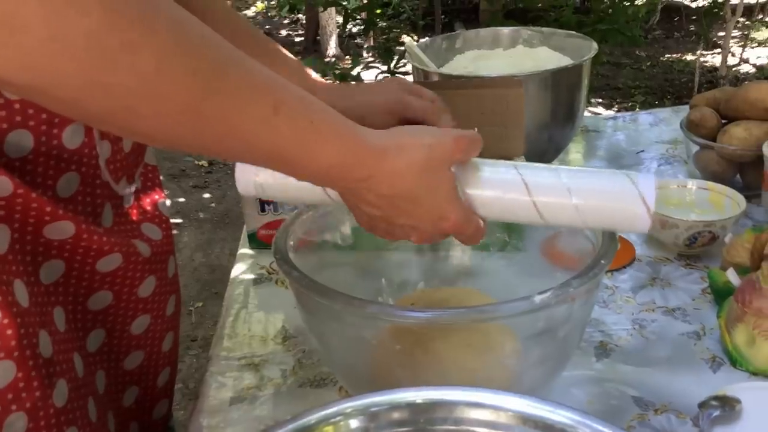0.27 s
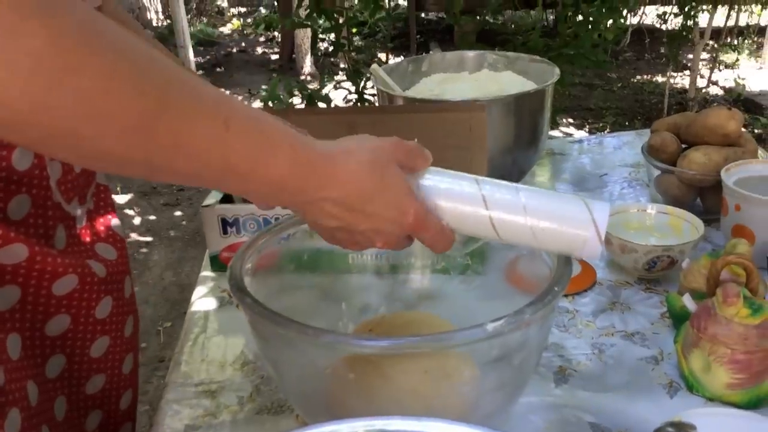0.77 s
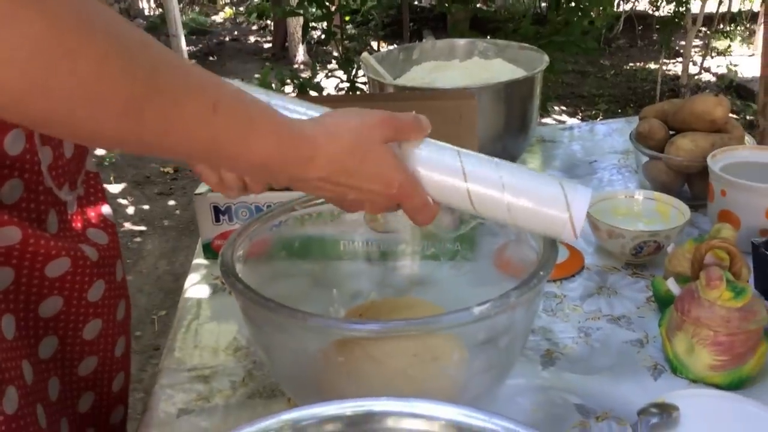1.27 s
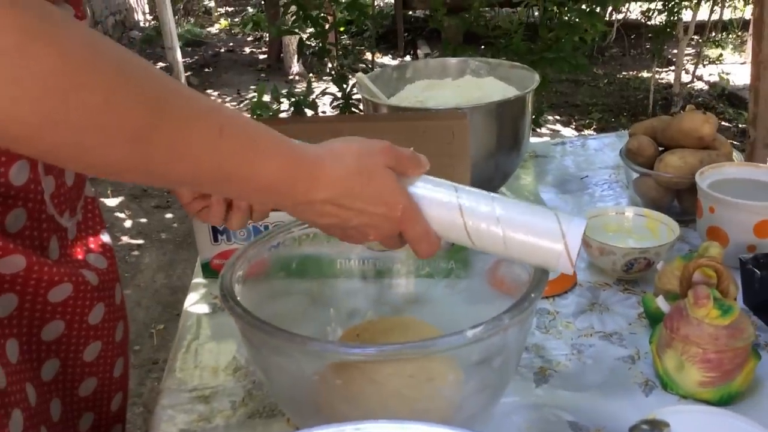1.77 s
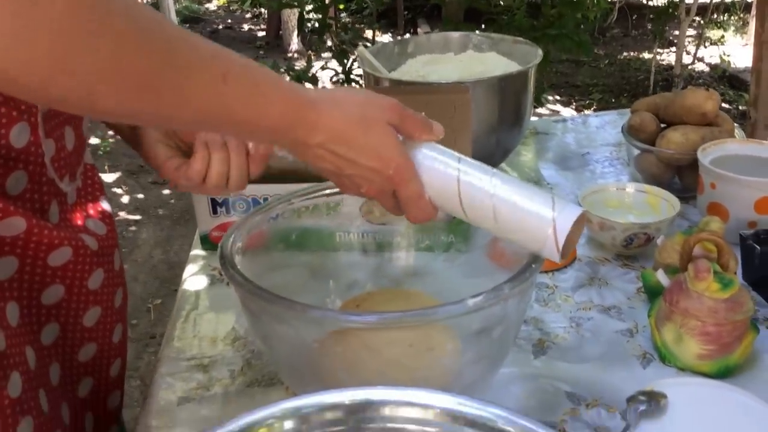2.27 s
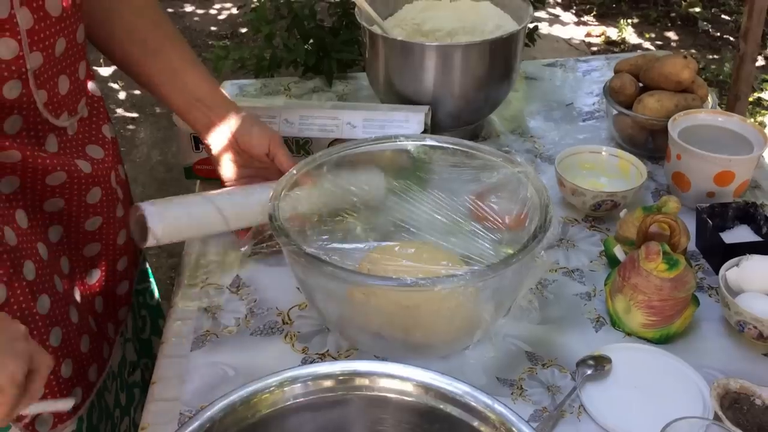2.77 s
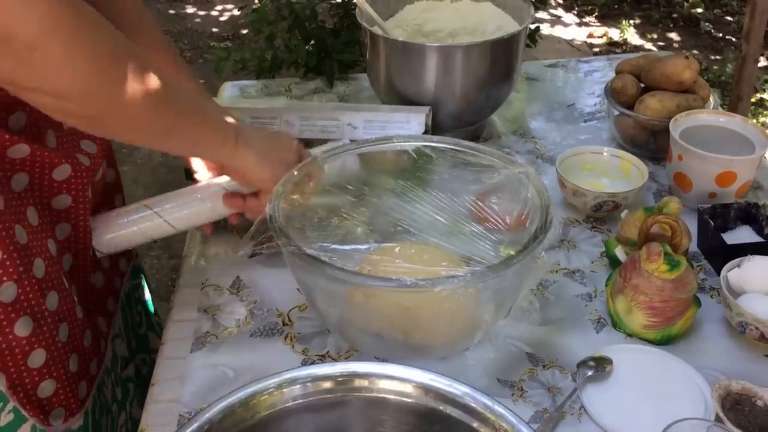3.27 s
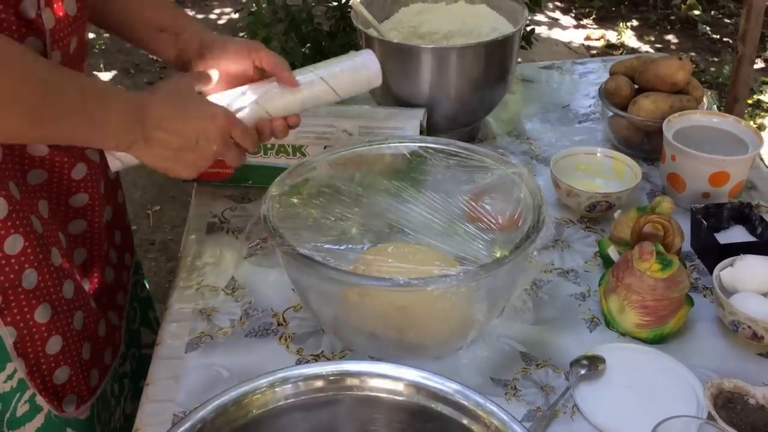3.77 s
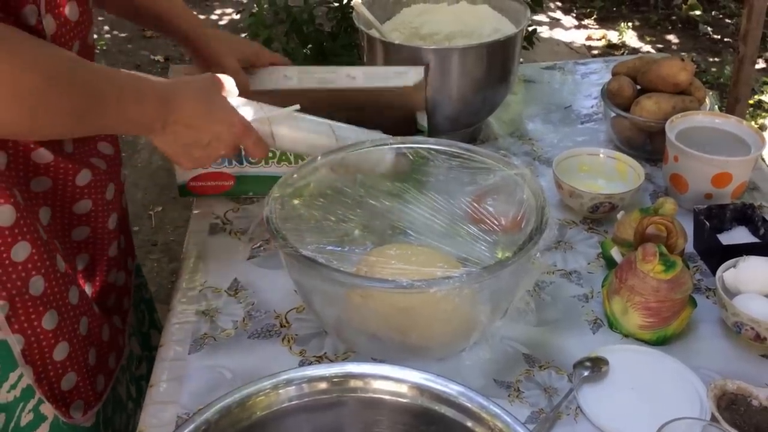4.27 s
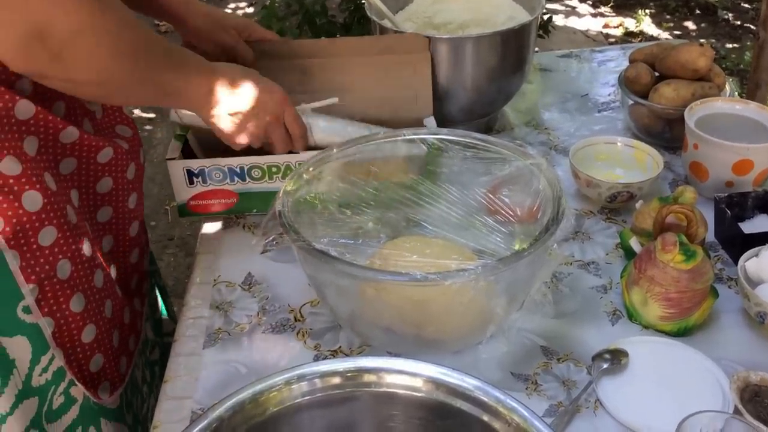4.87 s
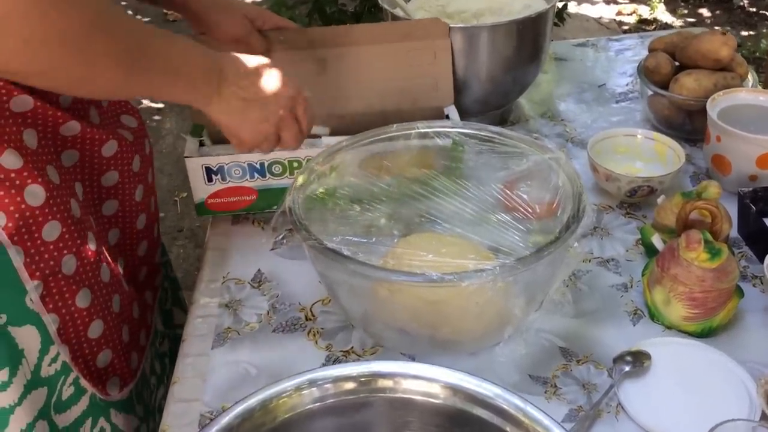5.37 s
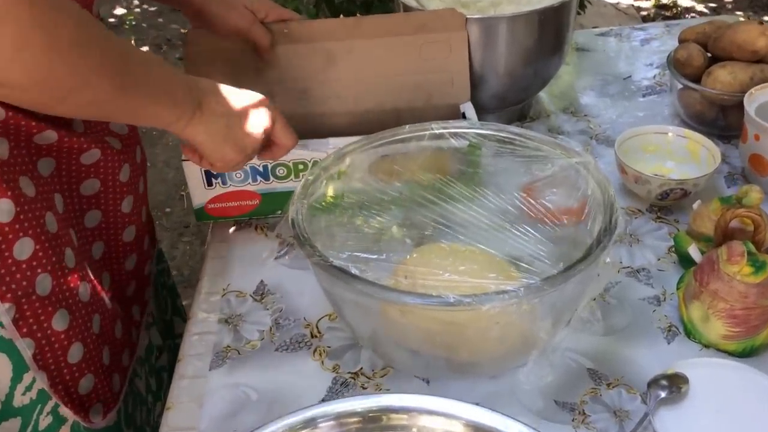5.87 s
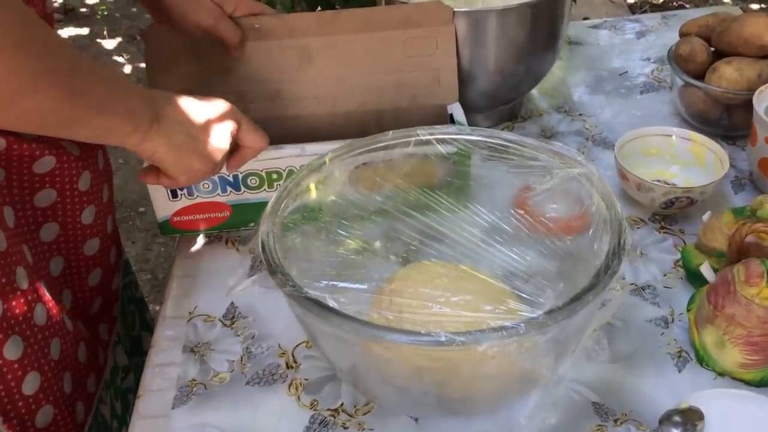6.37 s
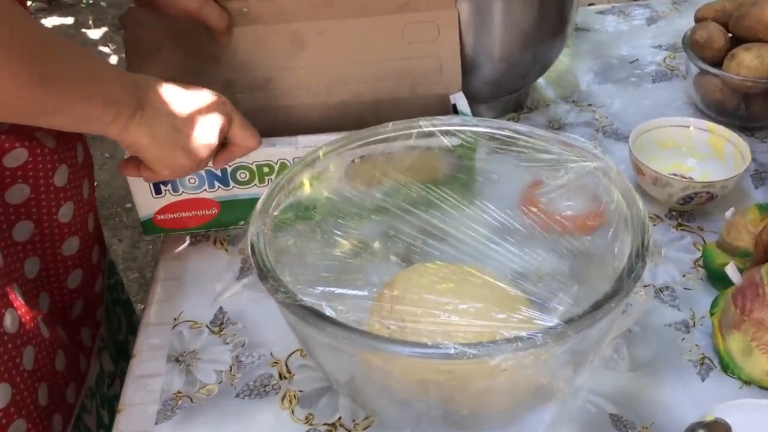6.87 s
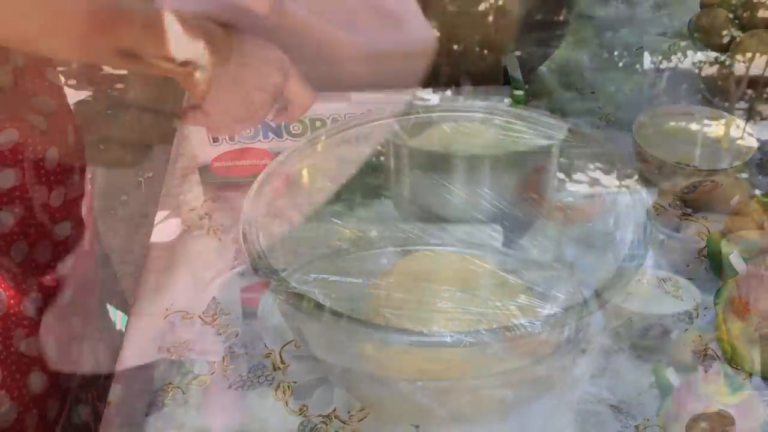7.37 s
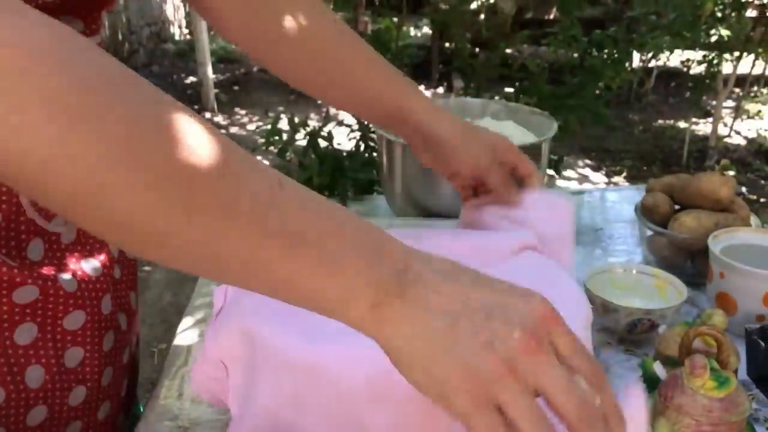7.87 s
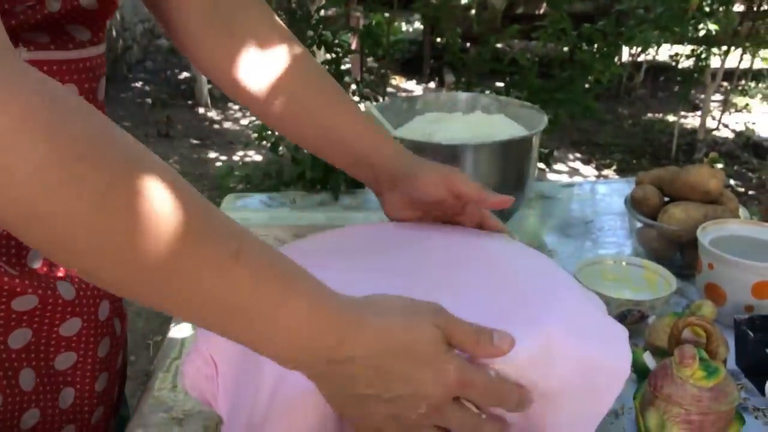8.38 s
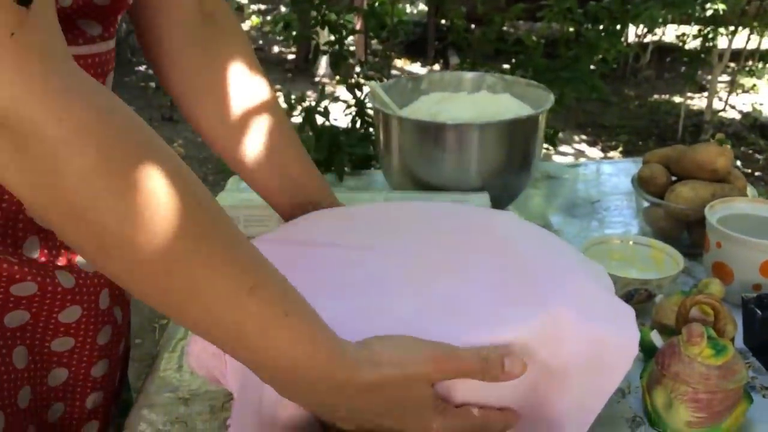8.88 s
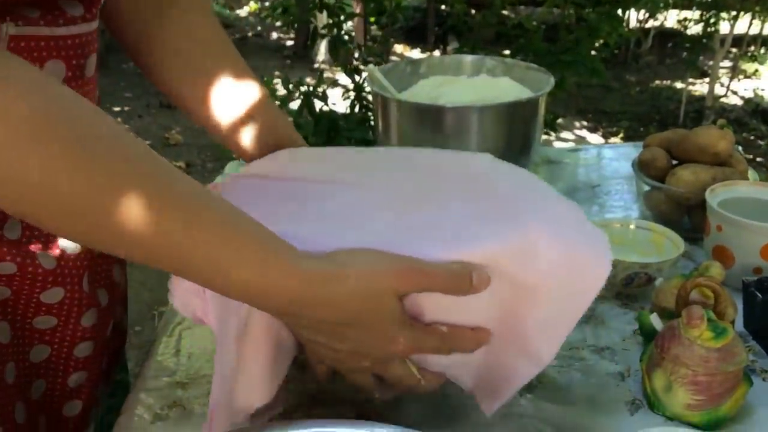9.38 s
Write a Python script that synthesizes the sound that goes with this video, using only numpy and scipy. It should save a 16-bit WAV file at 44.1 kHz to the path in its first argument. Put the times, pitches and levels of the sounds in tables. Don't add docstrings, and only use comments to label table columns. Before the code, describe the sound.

Near microphone outdoors, little echo. Faint gliding bird whistles open over low airy rumble. Thin plastic film rustles, then snaps sharply in dense bursts as it is pulled and torn over a glass bowl. Hollow cardboard taps lead to heavy carton thumps around five seconds, then creasing card and nudges. After a quick rustling swell and tiny dropout, a cloth brushes the bowl softly, ending with light film ticks.

```python
import sys
import numpy as np
from scipy import signal
from scipy.fft import rfft, irfft
from scipy.io import wavfile
from scipy.ndimage import uniform_filter1d, minimum_filter1d

SR = 44100
rng = np.random.default_rng(int(sys.argv[2]) if len(sys.argv) > 2 else 0)


def master(y):
    cut = np.clip(np.atleast_2d(y).T, -1, 1)
    pcm = np.round(cut * 32767)
    wavfile.write(sys.argv[1], SR, pcm.astype(np.int16))


def attenuation_scalar(level_db):
    decades = np.asarray(level_db, float) / 20
    return 10 ** decades


N = 424241


def time(length):
    return np.arange(int(length * SR)) / SR


def evened(x):
    return x / np.sqrt(np.mean(x ** 2) + 1e-20)


def peaked(x):
    return x / abs(x).max()


def read(points, hz):
    f, value = np.transpose(points)
    return np.interp(np.log(hz + 1), np.log(f + 1), value)


def add(mix, s, sound):
    part = mix[round(s * SR):][:len(sound)]
    part += sound[:len(part)]


def band(x, low_hz, high_hz):
    return signal.sosfilt(signal.butter(3, [low_hz, high_hz], "band", fs=SR, output="sos"), x)


def coloured(x, points):
    gain_db = read(points, abs(np.fft.fftfreq(2048, 1 / SR)))
    log_gain = np.log(attenuation_scalar(np.maximum(gain_db, -90)))
    taps = np.fft.ifft(np.exp(np.conj(signal.hilbert(log_gain)))).real[:1024]
    return signal.oaconvolve(x, taps / np.linalg.norm(taps))[:len(x)]


def resonate(x, hz, width):
    return signal.lfilter(*signal.iirpeak(hz, hz / width, SR), x)


def ring(hz, t60, rise):
    t = time(1.2 * t60 + rise)
    onset = np.sin(np.pi / 2 * np.minimum(t / rise, 1)) ** 2
    return np.sin(2 * np.pi * hz * t) * attenuation_scalar(-60 * t / t60) * onset


def grains(per_s, spread_db):
    size = attenuation_scalar(spread_db * np.minimum(rng.exponential(1, N), 5)) * rng.choice([-1., 1.], N)
    return evened(size * (rng.random(N) < per_s / SR))


def swell(middle, length):
    return np.exp(-(3.06 * (np.arange(N) / SR - middle) / length) ** 2)


def drifting(shape, frames, bins):
    patches = rng.standard_normal(shape)
    return evened(uniform_filter1d(uniform_filter1d(patches, size=bins, axis=0), size=frames, axis=1))


def mottled(x, patchy_db):
    z = signal.stft(x, nperseg=512, noverlap=384)[2]
    patches = drifting(z.shape, frames=14, bins=10)
    return evened(signal.istft(z * attenuation_scalar(patchy_db * patches), nperseg=512, noverlap=384)[1][:len(x)])


# frequency in Hz, level in dB per Hz
AIR = [(15, -59.5), (25, 1.5), (97, 3), (256, -6.5), (451, -23), (489, -30), (714, -18), (840, -16),
       (1070, -17.5), (1260, -12), (3710, -22), (14700, -28.5), (16000, -58)]


def air():
    frames, hz = N // 256 + 5, np.fft.rfftfreq(1024, 1 / SR)
    a, b = rng.standard_normal((2, 513, frames))
    flicker = evened(uniform_filter1d(rng.standard_normal(frames), size=6))
    patches = drifting((513, frames), frames=12, bins=20)
    steadier_lows = np.clip(hz / 300, .45, 1)[:, None]
    level_db = read(AIR, hz)[:, None] + (2.6 * patches + 1.4 * flicker) * steadier_lows
    z = (a + 1j * b) * attenuation_scalar(level_db)
    return attenuation_scalar(-57) * evened(signal.istft(z, nperseg=1024, noverlap=768)[1][:N])


# start in seconds, length in seconds, first pitch in Hz, last pitch in Hz, level in dB
BIRD = [(.155, .055, 3350, 2400, -63), (.3, .09, 3200, 3080, -67), (.375, .06, 4350, 4100, -66),
        (.58, .09, 3300, 2700, -61), (.685, .06, 3800, 3500, -61), (.9, .085, 3650, 2450, -61),
        (1.05, .08, 4100, 3400, -65), (1.13, .05, 3700, 3100, -64), (6.39, .065, 2100, 2550, -70),
        (6.445, .09, 2550, 2300, -70), (6.585, .13, 4100, 2600, -67), (6.96, .09, 4100, 2800, -66)]


def bird():
    out = np.zeros(N)
    husk = 1 + 1.1 * evened(uniform_filter1d(rng.standard_normal(N), size=200))
    for s, length, first_hz, last_hz, db in BIRD:
        u = time(length) / length
        pitch = first_hz + (last_hz - first_hz) * u ** 1.4
        whistle = np.sin(2 * np.pi * np.cumsum(pitch) / SR)
        add(out, s, attenuation_scalar(db + 9) * whistle * (.4 + .8 * u) * signal.windows.tukey(len(u), .5))
    echoes = rng.standard_normal(6000) * attenuation_scalar(-60 * np.arange(6000) / SR / 0.23)
    return .6 * husk * out + 1.1 * signal.oaconvolve(out, echoes / np.linalg.norm(echoes))[:N]


# start in seconds, level in dB
TOUCHES = [
    (1.394, -40),
    (3.37, -60),
]
# pitch in Hz, level in dB, time to fall 60 dB in seconds
BOWL = [(1034, 0, .67), (1933, -9, .25), (2794, -16, .2)]


def bowl():
    out = np.zeros(N)
    for s, blow_db in TOUCHES:
        for hz, db, t60 in BOWL:
            add(out, s, attenuation_scalar(blow_db + db) * ring(hz, t60, rise=0.00079))
    return out


def rubbed(notes):
    out = np.zeros(N)
    for s, length, hz, db in notes:
        rub = rng.standard_normal(SR // 2)
        note = resonate(resonate(rub, hz, .04 * hz), hz, .04 * hz)
        note = evened(note)[-len(time(length)):]
        add(out, s, attenuation_scalar(db + 7.5) * note * signal.windows.tukey(len(note), .5))
    return out


# start in seconds, length in seconds, pitch in Hz, level in dB
RIM = [(7.85, .45, 2760, -73), (7.865, .1, 2760, -68), (7.715, .12, 1100, -71), (8.07, .05, 1320, -67),
       (7.83, .5, 1330, -75), (8.21, .08, 1320, -69), (7.94, .1, 1640, -72), (3.71, .05, 2650, -64),
       (4.827, .024, 4780, -53), (4.51, .06, 2420, -65), (7.86, .2, 3250, -70), (7.94, .2, 3620, -75),
       (8.2, .07, 3150, -69), (8.07, .07, 5700, -70)]


def rim():
    return rubbed(RIM)


# start in seconds, length in seconds, pitch in Hz, level in dB
SQUEAKS = [(2.93, .045, 2500, -66), (3.015, .03, 3280, -67), (3.255, .03, 3100, -67),
           (3.42, .045, 1550, -69), (3.505, .05, 1600, -68), (3.37, .09, 1940, -64),
           (4.311, .02, 3500, -44), (2.95, .06, 950, -63), (2.12, .075, 3300, -69), (5.6, .25, 1300, -73),
           (6.22, .025, 2850, -66), (6.035, .02, 2200, -48), (5.325, .035, 980, -46),
           (5.33, .022, 3250, -52), (.93, .11, 950, -68), (8.07, .025, 3850, -68), (7.94, .04, 5600, -70),
           (8.22, .04, 2950, -69), (4.5, .1, 930, -59), (4.78, .03, 3900, -68), (4.85, .03, 2800, -64),
           (4.571, .024, 2430, -48), (7.17, .13, 3050, -57)]


def squeaks():
    return rubbed(SQUEAKS)


# frequency in Hz, level in dB per Hz
RUSTLE = [(880, -34.5), (1500, 3.5), (2640, 5), (3000, 8.5), (3280, 7.5), (6690, 0.5), (12400, -7.5),
          (15400, -16), (16000, -49)]
# time in seconds, effort in dB
RUSTLING = [(0.0, -62), (0.59, -60.5), (0.94, -51.5), (1.1, -56), (1.39, -62.5), (1.9, -50.5), (2.04, -54),
            (2.65, -63), (2.76, -67.5), (3.56, -56.5), (3.91, -58.5), (4.07, -68), (4.35, -56), (6.03, -57),
            (6.92, -72), (7.21, -44), (7.5, -64.5), (9.62, -65)]


def rustling(ticks, effort_db):
    return attenuation_scalar(effort_db) * mottled(coloured(ticks, RUSTLE), patchy_db=2.6)


# middle in seconds, length in seconds, centre in Hz, level in dB
BRUSHES = [(1.418, 0.18, 3900, -44.5), (4.987, .06, 4500, -49), (4.93, .1, 4000, -56),
           (5.035, .04, 3500, -49), (4.325, .04, 2500, -46), (2.09, .03, 4000, -46), (1.74, .08, 5500, -36),
           (5.43, .06, 4500, -58), (3.975, .1, 1500, -54), (1.566, 0.079, 5000, -51.5),
           (2.586, 0.085, 9000, -36), (2.633, 0.34, 6200, -40), (2.993, 0.22, 4620, -56),
           (2.97, 0.13, 1000, -56.5), (3.531, 0.089, 1780, -55), (3.983, 0.28, 2570, -49.5),
           (4.38, 0.16, 3200, -58), (4.668, 0.23, 3600, -56.5), (4.84, 0.04, 1600, -47),
           (5.123, 0.039, 1980, -37.5), (5.169, 0.16, 1500, -32.5), (5.341, 0.14, 1600, -38.5),
           (6.854, 0.043, 1500, -56.5), (7.206, 0.14, 1500, -40), (7.954, 0.12, 4730, -57),
           (8.093, 0.099, 3900, -62), (8.26, 0.3, 3450, -60), (8.5, 0.3, 1600, -56),
           (9.285, 0.06, 3200, -46.5)]


def brushes(ticks):
    out = np.zeros(N)
    for middle, length, hz, db in BRUSHES:
        start = middle - length / 2
        part = ticks[round(start * SR):][:len(time(length))]
        brush = resonate(resonate(part, hz, 1.6 * hz), hz, min(5.4 * hz, 12000))
        add(out, start, attenuation_scalar(db) * evened(brush) * np.hanning(len(part)))
    return out


# pitch in Hz, width in Hz, level in dB
HOLLOW = [(195, 64, -5), (290, 180, 6.5), (374, 58, 10.5), (466, 53, 5), (803, 160, -6.5), (980, 130, 6.5),
          (1500, 850, -3), (2200, 440, -32)]
# time in seconds, effort in dB
GRIP = [(0.0, -62), (1.37, -54.5), (2.6, -59), (2.84, -55.5), (4.23, -51.5), (4.39, -57), (4.93, -54.5),
        (5.19, -33.5), (5.54, -57.5), (5.95, -61.5), (6.16, -50), (6.59, -61), (7.02, -67), (7.23, -41),
        (7.53, -70), (8.38, -59.5), (9.62, -64)]
# middle in seconds, length in seconds, level in dB
DRAGS = [(1.317, 0.088, -50), (2.1, 0.058, -45), (2.196, 0.14, -47), (2.603, 0.19, -38), (2.733, 0.19, -50),
         (4.258, 0.071, -47), (4.353, 0.28, -47), (4.565, 0.19, -44.5), (5.008, 0.1, -31), (5.2, 0.04, -25),
         (5.16, .1, -36), (5.38, .1, -42), (2.065, .05, -42), (5.215, 0.017, -52), (6.869, 0.057, -40.5)]


def hollow_handling(ticks, bumps, effort_db):
    low_bumps = band(bumps, 100, 750)
    drum = evened(sum(attenuation_scalar(db) * resonate(low_bumps, hz, w) for hz, w, db in HOLLOW[:4]))
    scrape = evened(sum(attenuation_scalar(db) * resonate(ticks + bumps, hz, w) for hz, w, db in HOLLOW[4:]))
    scrape_db = -64 + 0.37 * (effort_db - effort_db.mean())
    grip = attenuation_scalar(np.interp(np.arange(N) / SR, *np.transpose(GRIP)))
    for middle, length, db in DRAGS:
        grip = grip + attenuation_scalar(db) * swell(middle, length)
    return attenuation_scalar(scrape_db) * scrape + grip * drum


def handling():
    effort_db = np.interp(np.arange(N) / SR, *np.transpose(RUSTLING))
    clumps = evened(uniform_filter1d(uniform_filter1d(rng.standard_normal(N), size=400), size=400))
    ticks = 2.1 * grains(per_s=4600, spread_db=-1.0) + rng.standard_normal(N)
    ticks = ticks * attenuation_scalar(2.0 * clumps)
    bumps = grains(per_s=2500, spread_db=2.5) * attenuation_scalar(2.0 * clumps)
    return rustling(ticks, effort_db) + brushes(ticks) + hollow_handling(ticks, bumps, effort_db)


# start in seconds, peak in dB, pitch in Hz
THUDS = [(3.402, -34.5, 200), (4.245, -29, 156), (4.314, -26, 200), (4.974, -26, 123), (5.125, -21, 158),
         (5.1975, -1.5, 136), (5.143, -23, 210), (5.225, -22, 252), (5.344, -29, 176.5), (7.412, -31, 128),
         (7.921, -33.5, 235.5), (9.236, -38, 191)]


def thuds():
    out = np.zeros(N)
    for s, db, hz in THUDS:
        add(out, s - .004, attenuation_scalar(db + 5.5) * ring(hz, .075, rise=.011))
        add(out, s + .01, attenuation_scalar(db - 14) * ring(1.4 * hz, 0.17, rise=0.022))
        add(out, s, attenuation_scalar(db - 21) * ring(.93 * hz, 0.3, rise=.03))
    return out


def knocks(blows, contact):
    out, t = np.zeros(N), np.arange(3000) / SR
    for s, db, hz, wall_db, wall_hz in blows:
        z = rng.standard_normal(3000)
        split_hz = hz * (1 + .08 * z[0])
        add(out, s - .003, attenuation_scalar(db + 3 + 860 * contact) * ring(hz, 5.5 * contact, rise=contact * 1.15))
        add(out, s + .004, attenuation_scalar(db - 12.5) * ring(split_hz, 17 * contact, rise=contact * 3.0))
        add(out, s - .001, attenuation_scalar(db + wall_db + 290 * contact) * ring(wall_hz, 0.035, rise=contact * 0.19))
        puff = z * attenuation_scalar(890 * contact - 60 * t / 0.041) * np.minimum(t / contact, 1) ** 2
        rattle = attenuation_scalar(db + 10.5) * band(puff, 170, 607) + attenuation_scalar(db + wall_db + 5.5) * band(puff, 600, 1380)
        add(out, s - .002, rattle)
    return out


# start in seconds, peak in dB, hollow note in Hz, wall note in dB relative
TAPS = [(.823, -43, 487, -4), (.945, -46, 435, -11), (.984, -43.5, 473, 5), (1.036, -43, 440, -10),
        (1.285, -44, 322, -22), (1.879, -42, 421, -21), (1.395, -26.5, 481, 0.5), (2.047, -27, 481, -3),
        (2.29, -34, 377, -10), (2.319, -34.5, 443, 1.5), (2.533, -37.5, 232, -19.5), (2.588, -29, 523, 2.5),
        (2.679, -35.5, 412, -5), (2.802, -36, 407, -32), (2.999, -31, 462, -15), (3.195, -24.5, 385, -26),
        (3.371, -26.5, 393, -10.5), (3.53, -31, 467, -19.5), (3.627, -36.5, 516, -5),
        (3.712, -27, 442, -34), (3.862, -28, 477, -15), (4.117, -33, 497, -24), (2.0, -36, 450, -20),
        (3.742, -40, 450, -30), (4.02, -43, 480, -30), (4.135, -40, 500, -30)]


def taps():
    return knocks([(*row, 990) for row in TAPS], contact=0.0084)


# start in seconds, peak in dB, hollow note in Hz, wall in dB relative, wall in Hz
DROPS = [(4.254, -28.5, 408, -34, 1030), (4.315, -7, 469, -4, 987), (4.474, -18, 517, -4, 866),
         (5.0205, -.5, 452, -22, 800), (5.0335, -17, 470, -20, 940), (4.3215, -15, 380, 0, 900),
         (4.983, -15, 445, -8, 900), (5.092, -26, 425, -6.5, 785), (5.119, -16, 392, -5, 920),
         (5.191, -16.5, 302, -0.5, 780), (5.197, -5.5, 432, -8.5, 1264), (5.345, -29.5, 297, 9, 974),
         (5.389, -33.5, 353, -5, 980), (5.442, -42.5, 390, 6, 980)]


def drops():
    return knocks(DROPS, contact=0.0063)


# start in seconds, peak in dB, hollow note in Hz, wall in dB relative,
# wall in Hz
NUDGES = [(5.928, -27, 392, -6, 990), (5.995, -36.5, 357, 6.5, 980), (6.022, -23.5, 392, 7.5, 886),
          (6.0365, -19.5, 368, 4, 850), (6.123, -22, 363, 5, 980), (6.134, -29, 370, 2, 1000),
          (6.269, -23.5, 327, -2, 920), (6.321, -31, 444, 0.5, 880), (6.336, -28.5, 370, 8, 950),
          (5.97, -44, 400, 5, 980), (6.278, -33, 350, 4, 980), (6.556, -35, 270, -5, 924),
          (6.563, -36, 424, -3, 940), (6.842, -33.5, 295, -10, 1240), (7.022, -44.5, 420, 13, 1200),
          (7.102, -35.5, 246, -15, 774), (7.248, -25, 326, -27, 740), (7.32, -36.5, 427, -11, 800),
          (7.418, -21, 309, -7, 812), (7.918, -33, 244, -16.5, 825), (7.935, -25, 266, -14, 980),
          (9.28, -32, 430, -6, 970)]


def nudges():
    return knocks(NUDGES, contact=0.0057)


# start in seconds, peak in dB, hollow note in Hz, wall in dB relative, wall in Hz
ROCKS = [(4.972, -27, 445, -6, 860), (5.533, -41, 372, -6, 950), (5.548, -36, 380, -2, 950),
         (6.155, -28, 384, -16, 985), (6.372, -28, 369, -6, 780), (6.326, -35, 420, 2, 900),
         (4.578, -27, 487, -8, 944), (3.012, -37, 520, -10, 800), (5.485, -45, 400, 0, 900),
         (4.44, -41, 420, -15, 900), (2.078, -36, 460, -20, 900)]


def rocks():
    return knocks(ROCKS, contact=.012)


# pitch in Hz, width in Hz, level in dB
PATCHES = [(3450, 360, -1), (4120, 450, 12.5), (5450, 840, 10), (6700, 900, 2), (4550, 500, 10)]


def snap(out, s, db, body_db, ring_hz, low_hz):
    z = rng.standard_normal(3500)
    t = np.arange(3500) / SR - .012
    creep = attenuation_scalar(-14 + 1800 * t) * (t < 0)
    shake = np.exp(-(t / 0.0027) ** 2) + attenuation_scalar(-8 - 60 * t / 0.055) + attenuation_scalar(-34 - 60 * t / 0.12)
    tick = 7 * (abs(t) < .5 / SR)
    burst = z * np.sqrt(abs(z)) * (creep + shake * (t >= 0)) + tick

    film = 0.39 * band(burst, 2700, 8000)
    for k, (hz, width, patch_db) in enumerate(PATCHES):
        film = film + attenuation_scalar(patch_db) * resonate(burst, hz * (1 + 0.062 * z[k]), width)
    own_ring = peaked(resonate(burst, ring_hz, 550))
    film = peaked(film) + attenuation_scalar(-3 + max(body_db, 0)) * own_ring

    weight = low_hz / 1350
    body = .5 * band(burst, low_hz, 3000)
    body = body + 0.24 * weight ** 2 * resonate(burst, 1700, 500) + 0.052 * resonate(burst, 1900, 240)
    treble = signal.butter(3, 8500, "high", fs=SR, output="sos")
    sparkle = attenuation_scalar(-33) * weight ** 4 * peaked(signal.sosfilt(treble, burst - .7 * tick))
    sound = peaked(film) + attenuation_scalar(body_db + 3.5) * peaked(body) + sparkle
    add(out, s + .0005 + t[0], attenuation_scalar(db + .2) * sound)


# start in seconds, peak in dB, ring in Hz
CREASES = [(4.238, -57, 3000), (4.265, -58, 5200), (4.3152, -17, 3670), (4.3215, -25, 3400),
           (4.4746, -38, 6500), (4.318, -23, 3500), (5.972, -50, 2500), (6.128, -28, 4400),
           (4.574, -33, 2430), (4.5837, -35, 2390), (4.8384, -42, 1730), (4.981, -38, 3400),
           (5.019, -23, 3500), (5.086, -47, 2610), (5.1174, -35.5, 4050), (5.123, -30, 3300),
           (5.1947, -16, 3800), (5.301, -43, 1500), (5.3305, -35, 3200), (5.3459, -34.5, 1500),
           (2.0468, -14, 4700), (5.928, -52, 2250), (5.994, -53, 2200), (6.023, -50, 2200),
           (6.0365, -27.5, 2200), (6.084, -54, 3000), (6.125, -21, 2200), (6.2058, -52, 3300),
           (6.2667, -48, 2200), (6.31, -51, 3400), (6.321, -45, 2200), (6.3317, -30.5, 3070),
           (6.3745, -48.5, 2200), (6.473, -46, 3700), (6.5556, -54, 2960), (6.6848, -47.5, 4000),
           (6.8572, -33, 3000), (7.416, -35.5, 3030), (7.9342, -44, 2100), (8.495, -58, 2000)]


def creases():
    out = np.zeros(N)
    for s, db, ring_hz in CREASES:
        snap(out, s, db, -5.5 - 0.2706 * db, ring_hz, low_hz=600)
    return out


# start in seconds, peak in dB, body under 3 kHz in dB relative, ring in Hz
FOLDS = [(.821, -32, -9, 3990), (.872, -31, -7, 4050), (.944, -30, -14.5, 3950),
         (.983, -29.5, -9.5, 2640), (1.008, -36, -12, 4300), (1.0366, -32, -13, 3000),
         (1.1, -32.5, -11.5, 3830), (1.287, -33.5, -9, 2910), (1.3007, -21, -9, 3820),
         (1.3085, -20, -9, 5000), (1.3205, -28, -6, 3500), (1.364, -38, -8, 5000), (1.437, -30, -8, 5500),
         (1.3947, -18.5, -1.5, 4030), (1.4082, -22, -13, 6000), (1.7115, -24, -30, 5900),
         (1.716, -11.5, -41, 4150), (1.727, -9.5, -41, 4300), (1.7338, -15, -30, 4160),
         (1.738, -19, -28, 4790), (1.7505, -14, -31, 6700), (1.7535, -15, -31, 6000),
         (1.7576, -9, -33, 4330), (1.7592, -7, -30, 6800), (1.7704, -21, -15, 6780),
         (1.786, -30, -10, 5000), (1.8478, -20, -20, 6500), (1.907, -36, -14, 7000),
         (1.837, -21, -25, 6690), (1.8426, -22, -28, 7400), (1.8508, -7.5, -10.5, 6600),
         (1.974, -37, -14, 6700), (1.9954, -18.5, -8.5, 6500), (2.0078, -20, -7, 6700),
         (2.0152, -20, -8, 6750), (2.0935, -28, -11, 4700),
         (2.232, -37, -15, 3860), (2.264, -32.5, -13, 7060), (2.2888, -22.5, -8.5, 6380),
           (2.32, -17, -13.5, 3700), (2.3251, -29, -4, 3320), (2.358, -36, -15, 3810),
           (2.409, -45, -5, 5780), (2.4307, -41, -9, 3390), (2.464, -37.5, -11, 4920),
           (2.505, -38.5, -10, 3390), (2.5685, -10, -11, 7000), (2.5925, -20, -18, 6000),
           (2.5995, -17, -16, 6500), (2.607, -24, -12, 2500), (2.673, -30, -15, 7500),
           (2.705, -33, -6, 5000), (2.5832, -18, -18, 7500), (2.5955, -13, -19, 6730),
           (2.6028, -17, -9, 6500), (2.619, -24, -12, 4060), (2.629, -23, -12, 6880),
           (2.642, -27.5, -7, 6890), (2.7175, -32, -10, 6940), (2.7682, -39, -22, 6350),
           (2.777, -32, -22, 6370), (3.046, -40, -24, 4400), (3.349, -35, -14, 5770),
           (3.3601, -23, -16, 3880), (3.3662, -20, -16.5, 3940), (7.022, -26.5, -13, 2980),
           (9.248, -31.5, -9.5, 3210), (9.282, -26, -27, 3060), (9.288, -29, -12, 2860)]


def film_snaps():
    out = np.zeros(N)
    for row in FOLDS:
        snap(out, *row, low_hz=1350)
    return out


def yard(x):
    t = time(0.304)
    sparse = rng.choice([-1., 1.], len(t)) * (rng.random(len(t)) < .05)
    echoes = sparse * attenuation_scalar(-60 * t / 0.089) * (t > .003)
    return signal.oaconvolve(x, echoes / np.linalg.norm(echoes))[:N]


def scene():
    background = air() + bird() + bowl() + rim() + squeaks() + handling()
    hits = thuds() + taps() + drops() + nudges() + rocks() + creases() + film_snaps()
    return (background + hits + attenuation_scalar(-12) * yard(hits))[None]


THIN_MOMENTS = [.122, .4, .656, .772, 1.654, 2.165, 2.38, 2.538, 4.139, 4.748, 5.067, 5.276, 5.462, 6.437,
                8.04, 8.783, 9.154]


def thinned(x):
    out, hz = x.copy(), np.fft.rfftfreq(2048, 1 / SR)
    window = np.sqrt(np.pad(signal.windows.tukey(1600, .5), 224))
    for s in THIN_MOMENTS:
        part = x[0, round(s * SR) - 1024:][:2048] * window
        z = rfft(part)
        strongest = abs(z) >= -minimum_filter1d(-abs(z), size=17)
        gain = attenuation_scalar(np.where(strongest | np.roll(strongest, 1), 4, -10))
        gain = np.where((hz < 1200) | (hz > 10000), 1, gain)
        add(out[0], s - 1024 / SR, window * (irfft(z * gain) - part))
    return out


def roll_off(x):
    return signal.sosfilt(signal.butter(12, 16140, fs=SR, output="sos"), x)


def record(dry):
    t = np.arange(N) / SR
    kept = np.clip(np.maximum(7.442 - t, t - 7.488) / 0.0017, 0, 1)
    edge = signal.firwin(255, 15650, window=("kaiser", 8), fs=SR)[None]
    firm = signal.lfilter(*signal.butter(3, 50, "high", fs=SR), dry)
    limited = signal.oaconvolve(np.clip(firm, -.71, .71), edge, "same")
    mix = thinned(limited * kept)
    return roll_off(mix)


dry = scene()
out = record(dry)
master(out)
```